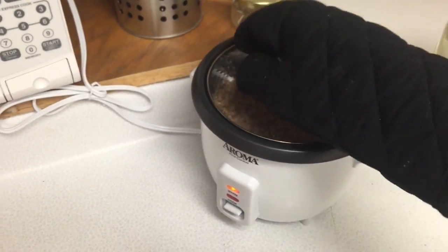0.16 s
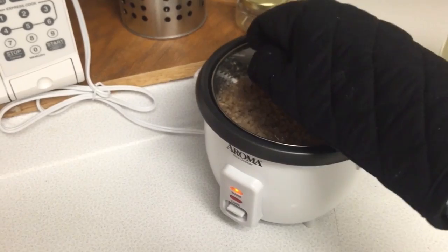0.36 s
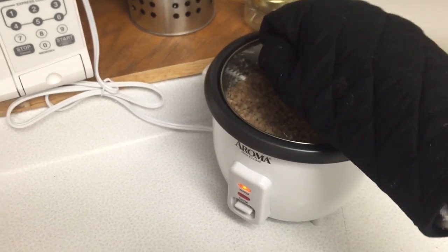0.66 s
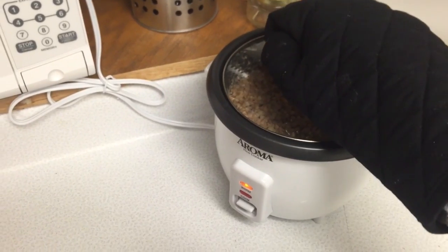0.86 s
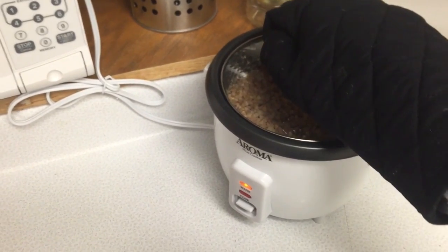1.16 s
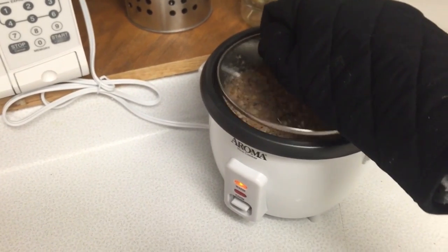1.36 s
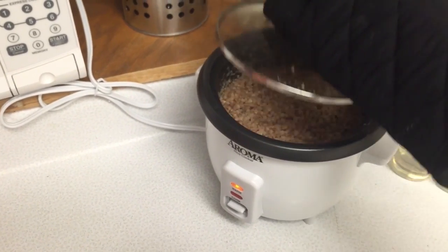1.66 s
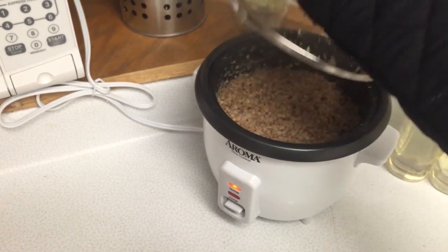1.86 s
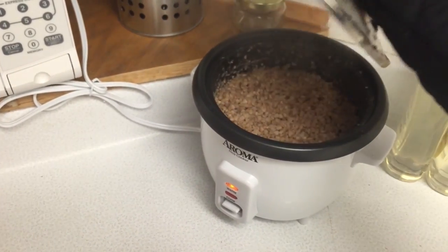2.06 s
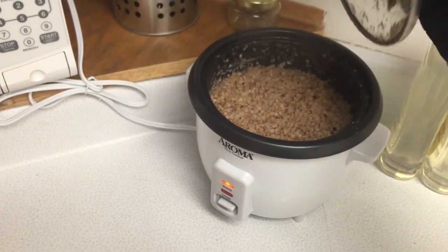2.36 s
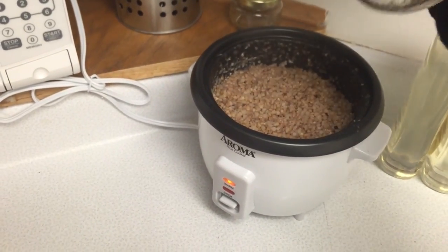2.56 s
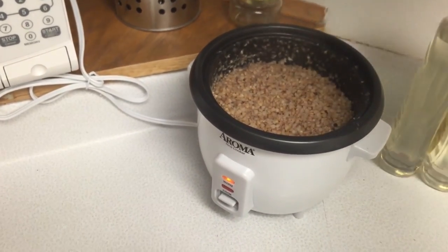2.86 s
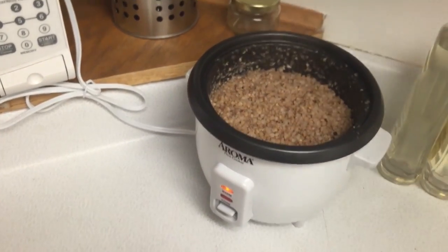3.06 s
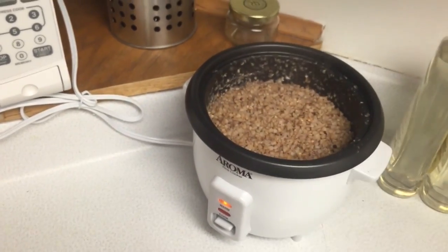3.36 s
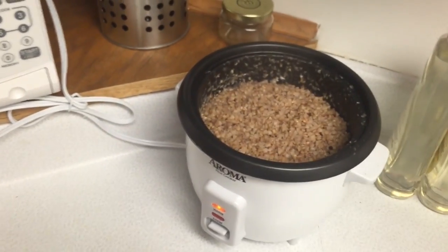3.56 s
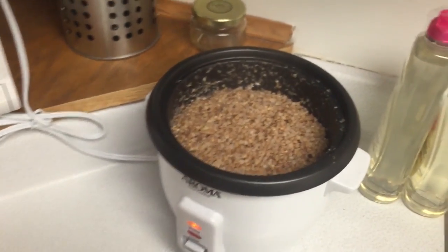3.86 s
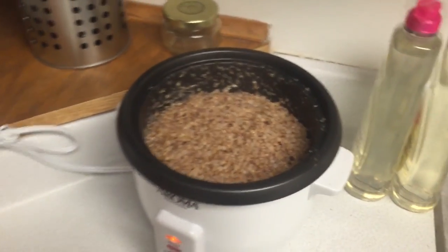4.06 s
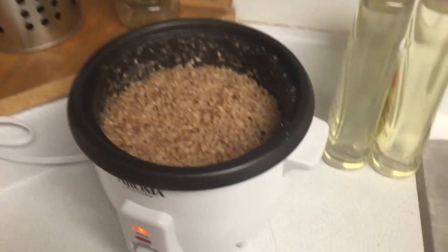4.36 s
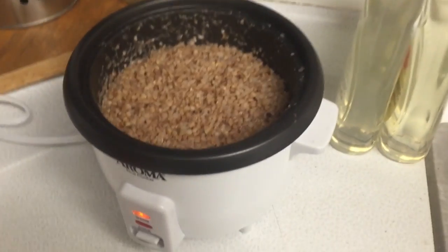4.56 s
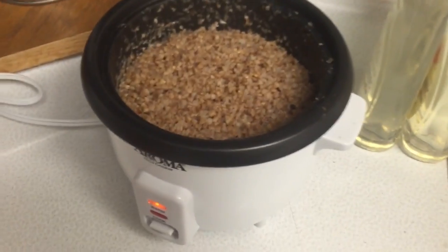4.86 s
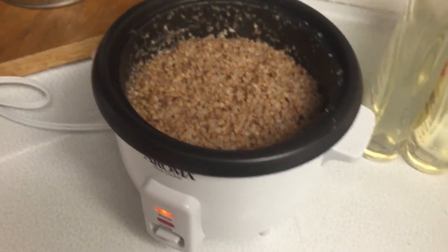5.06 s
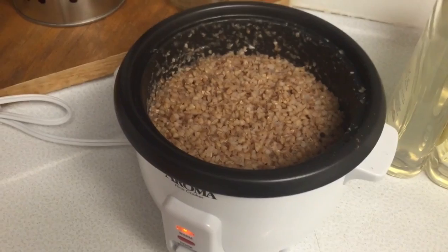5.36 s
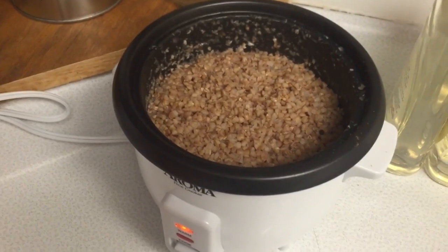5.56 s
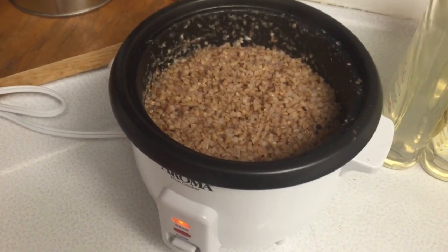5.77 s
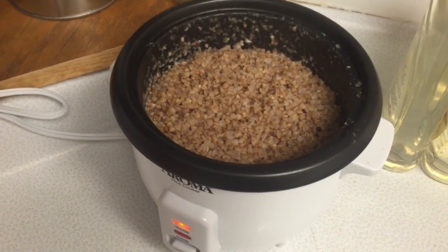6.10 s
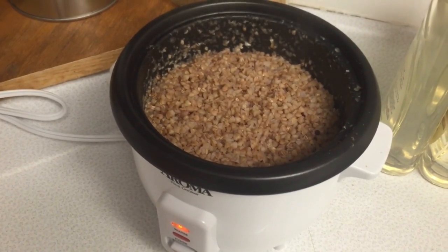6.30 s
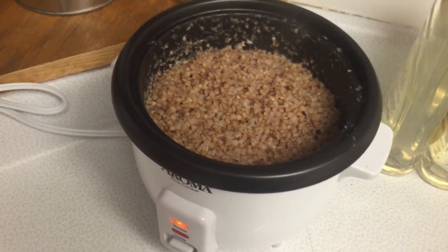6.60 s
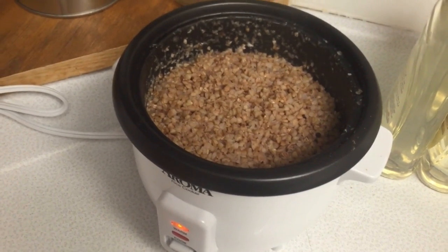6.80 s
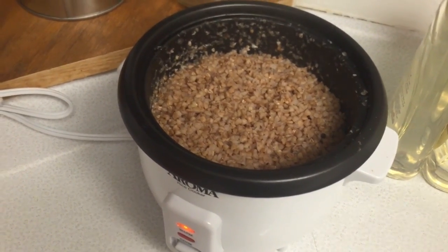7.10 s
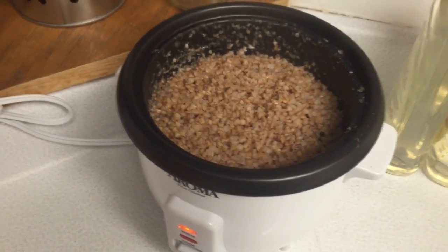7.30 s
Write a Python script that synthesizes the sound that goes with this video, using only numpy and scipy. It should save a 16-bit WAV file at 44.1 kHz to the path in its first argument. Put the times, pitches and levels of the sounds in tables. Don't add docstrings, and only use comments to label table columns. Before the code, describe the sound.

A handheld microphone near a rice cooker picks up low motor hum and airy room noise. Cloth rubs with short rubbery squeaks, a firm thud and several soft glass rattles, then a stronger knock as the lid lifts. Steam hisses slightly more from the open pot. One sharp glass clink rings briefly; after a quiet stretch of tiny ticks, another shorter clink lands. Light indoor reverberation.

```python
import sys
import numpy as np
from scipy import signal
from scipy.fft import rfft, irfft, next_fast_len
from scipy.io import wavfile
from scipy.ndimage import uniform_filter1d, map_coordinates

SR = 44100
rng = np.random.default_rng(int(sys.argv[2]) if len(sys.argv) > 2 else 0)


def magnitude_from_level(level_db):
    exponent = np.asarray(level_db, float) / 20
    return 10 ** exponent


def log_audio(samples):
    frames = np.atleast_2d(samples).T
    limited = np.clip(frames, -1, 1)
    pcm = np.round(limited * 32767).astype(np.int16)
    wavfile.write(sys.argv[1], SR, pcm)


N = 328104
TIME = np.arange(N) / SR

COMPRESSOR_HZ, MAINS_HZ = 58.805, 59.985
# multiple, level far from the pot/dB
# rms, level close to it/dB rms
COMPRESSOR_OVERTONES = [(1, -64, -64), (2, -61.5, -61), (3, -79.5, -69.5), (4, -73.5, -75), (5, -70, -76),
                        (6, -67, -70.5), (7, -71, -72.5), (9, -73, -101), (10, -83.5, -98),
                        (12, -83.5, -79), (13, -82, -81.5), (15, -77.5, -87), (17, -84.5, -81.5),
                        (19, -80.5, -81), (23, -86.5, -94), (24, -83.5, -76.5), (27, -91.5, -84),
                        (31, -80.5, -81), (32, -82, -81), (35, -87, -100), (36, -99, -92), (38, -96, -77),
                        (83, -85, -83), (95, -85, -89)]
# multiple, level/dB rms
MAINS_OVERTONES = [(1, -103), (2, -71), (6, -75), (40, -97), (52, -92), (53, -94), (55, -83.5), (58, -90.5),
                   (59, -86), (60, -83), (63, -87.5), (64, -91), (66, -89), (68, -86)]
# t/s, f/Hz, level/dB rms
DRONE = [(0.0, 470.1, -56.5), (0.23, 470.3, -54), (1.41, 470.8, -56), (1.43, 469.7, -53.5),
         (1.72, 470.8, -57.5), (1.93, 470.3, -55.5), (4.21, 470.7, -55.5), (4.25, 470.7, -61),
         (4.31, 470.7, -54.5), (5.12, 470.3, -59), (5.37, 470.5, -55.5), (5.51, 470.3, -60.5),
         (5.78, 470.7, -54.5), (5.82, 470.2, -60.5), (6.15, 470.8, -58), (7.25, 470.0, -59),
         (7.38, 468.7, -54.5), (7.44, 467.8, -60)]

# f/Hz, level/dB per Hz
RUMBLE_SPECTRUM = [(22, -50), (36, -10), (48, 1), (62, -13), (90, 6), (140, 1), (180, -6.5), (300, -9),
                   (450, -12), (700, -52)]
# f/Hz, level/dB per Hz
AIR_SPECTRUM = [(290, -15.5), (500, 4.5), (519, -3.5), (560, -2), (690, -4.5), (832, -5), (1030, -1),
                (1290, -5), (1370, -4.5), (2310, -3), (3000, -13.5), (3900, -17.5), (6600, -120)]
# f/Hz, level/dB per Hz
HISS_FAR = [(2200, -24), (2900, -1), (4200, 2), (5000, -1.5), (6000, 1.5), (6700, 2.5), (7400, -1.5),
            (8500, 1.5), (9800, -2.5), (10500, -6.5), (11300, -3.5), (15250, -6.5), (15350, -42.5),
            (16500, -47)]
# f/Hz, level/dB per Hz
HISS_NEAR = [(2200, -16), (2900, -0.5), (4200, 4.5), (5000, 0), (5800, 2), (6700, 5), (7500, -2), (8100, 3),
             (9000, 4), (10400, -2.5), (11300, -2.5), (15250, -5.5), (15350, -43), (16500, -48)]
RUMBLE_FAR_DB, RUMBLE_NEAR_DB, RUMBLE_SETTLES_S, RUMBLE_SWAY_DB = -58, -60.5, 6.2, 1.4
ARM_DB, ARM_S, ARM_WIDTH_S = 3, 1.85, 0.3
AIR_DB, MASKING_DB, MASKING_STARTS_S = -62.5, -1.5, 0.73
LID_OFF_S, LID_SWING_S = 1.54, 0.8
STEAM_SHUT_DB, STEAM_OPEN_DB, PUFF_DB, PUFF_S, PUFF_WIDTH_S = -67.5, -64.5, 1.5, 2.13, 0.257
CLOTH_HISS_DB, CLOTH_HISS_S, CLOTH_HISS_WIDTH_S = 2.5, 0.34, 0.2

# t/s, level/dB
CLOTH_RUB = [(0.0, -67), (0.178, -53.5), (0.342, -64), (0.48, -50), (0.556, -58), (0.69, -57.5),
             (1.086, -64), (1.6, -74)]
# f/Hz, level/dB per Hz
CLOTH_SPECTRUM = [(400, -44), (850, -9), (1050, 3), (1180, 5.5), (1330, 2), (1550, -3), (1750, -2),
                  (1900, -12.5), (2050, -4), (2150, -20), (2250, -1), (2450, -16), (2600, -10), (3500, -33)]
# t/s, f/Hz
GRIP_PITCH = [(.12, 1236), (.2, 1333), (.235, 1250), (.285, 1325), (.32, 1360), (.345, 1343), (.365, 1312),
              (.405, 1320), (.53, 1155), (.6, 1070), (.64, 1265), (.675, 1330), (.71, 1350)]
# start t/s, hold/s, level/dB
KNOB_SLIPS = [(.125, .015, -66), (0.188, .025, -61), (.245, .01, -58), (0.274, 0.0084, -45.5),
              (0.32, 0.076, -46.5), (.43, .03, -62), (0.533, 0.078, -60), (.655, .012, -58),
              (0.681, .012, -51)]
# start t/s, hold/s, level/dB, f/Hz
CLOTH_SLIPS = [(0.073, .005, -66, 1900), (.155, 0.0101, -63.5, 2060), (.31, 0.0095, -63, 2240),
               (0.4, .005, -64.5, 2020), (.41, 0.0087, -66, 2200), (.325, .015, -64, 2710),
               (0.1116, 0.0197, -66.5, 1880), (.19, 0.0198, -65, 1990), (0.25, 0.017, -66, 1680),
               (.18, .02, -62.5, 1030)]
SLIP_RISE_DB_PER_S, SLIP_FALL_DB_PER_S = 496, 706

# t/s, peak level/dB, f/Hz
POT_THUDS = [(.46, -40, 276), (.4955, -26, 294), (.511, -45, 310), (.522, -44, 310), (.534, -46, 310),
             (.612, -37.5, 299), (.697, -34.5, 225), (1.4236, -27.5, 316)]
# t/s, peak level/dB, f/Hz
COUNTER_THUDS = [(.27, -47, 129), (.502, -32.5, 147), (.531, -36.5, 151), (.703, -41.5, 143),
                 (1.302, -41, 114), (1.442, -27, 127), (1.481, -37, 124), (2.642, -43, 108),
                 (3.028, -44.5, 122), (3.426, -43, 99), (3.494, -46, 115), (3.534, -61, 118),
                 (5.629, -40.5, 111)]
POT_T60_S, COUNTER_T60_S = 0.031, 0.073

# f/Hz, width/Hz, level/dB
GRIP_MODES = [(320.5, 9.9, 13.5), (972, 45, -10), (1620, 79, -3), (1900, 60, -33), (2220, 39, -16),
              (3030, 160, -28)]
ROCK_MODES = [(533, 25, -1), (1070, 64, -12), (1117, 130, -2.5), (1740, 27, 0), (2250, 110, -11),
              (3630, 70, -18)]
SETTLE_MODES = [(1010, 160, -11), (1340, 180, -8), (1660, 74, 1), (2260, 140, -17)]
SLIP_MODES = [(606, 100, -13), (1280, 180, -13.5), (1560, 370, 10.5), (2070, 140, 11), (2700, 180, -12),
              (3130, 440, 6), (4140, 370, 2), (5560, 250, 2), (6860, 400, -27)]
LIFT_MODES = [(480, 72, -2), (902, 50, -2.5), (1126, 75, -5), (1610, 47, 4), (1770, 33, -1),
              (2200, 80, -22), (2320, 110, -14), (2970, 160, -26), (4380, 80, -26), (5320, 49, -26)]
REST_MODES = [(750, 62, -2), (1110, 33, 5), (1600, 89, 6), (1840, 100, 0.5), (2160, 67, -1),
              (3700, 214, -15), (4520, 200, -13)]
# t/s, level/dB, length/s
CONTACTS = [
    [(.483, -49, 0.0061), (.4912, -38, 0.0034), (.4975, -47, 0.0065)],
    [(.599, -50, 0.0032), (.605, -43, 0.01), (.618, -48.5, 0.031)],
    [(.688, -50, 0.0067), (.695, -45, 0.0037), (.7, -43.5, 0.0045)],
    [(.909, -44, 0.0048), (.913, -40.5, 0.0055), (.918, -45.5, 0.0074)],
    [(1.421, -45, 0.005), (1.4245, -35.5, 0.0068), (1.43, -44, 0.0028), (1.437, -41, 0.0058),
     (1.451, -48, 0.0035), (1.463, -55, 0.006), (1.472, -53, 0.0055), (1.481, -58, 0.0065)],
    [(3.535, -50, 0.0074), (3.543, -48, 0.0053), (3.56, -58, .012), (5.829, -59, .005), (6.919, -58, .005)],
]
SCRATCH_DB = [-30, -11, -24, -2.5, -11, -7]
PADDING_HZ = [3280, 14000, 5000, 14000, 12000, 9000]
# f/Hz, level/dB per Hz
SCRATCH_SPECTRUM = [(200, -30), (450, 9), (720, -7), (1000, 6), (1800, -1), (3000, -8), (6500, -13),
                    (10000, -18), (15000, -49)]
# t/s, f/Hz, level/dB, t60/s
FREE_RINGS = [(0.4913, 1476, -33, 0.034), (0.4914, 1646, -26, 0.036), (.4915, 2260, -30, 0.044),
              (.4915, 2970, -43, 0.027), (.498, 970, -37, 0.066), (.498, 1620, -27.5, 0.046),
              (.6, 1050, -39, .05), (.6, 1470, -40, .04), (.6, 1740, -36, .05), (.605, 1200, -38, 0.068),
              (.606, 2250, -45, .04), (.606, 3540, -49, 0.071), (.62, 1750, -47, .07),
              (.7, 1650, -41, 0.054), (0.909, 1295, -38, 0.045), (0.909, 1600, -37, 0.028),
              (0.91, 1730, -38, 0.032), (.911, 2070, -37, 0.053), (.911, 2760, -47, .04),
              (.912, 3180, -43, 0.055), (.909, 5460, -47, .04), (.912, 5700, -47, .04),
              (1.4234, 893, -33, 0.063), (1.4245, 1070, -35, 0.054), (1.427, 1170, -40, 0.076),
              (1.4235, 1504, -33, 0.099), (1.4247, 1733, -28, 0.063), (1.4235, 2250, -30.5, 0.049),
              (1.4235, 2400, -40, .04), (1.4225, 2920, -43, 0.034), (1.464, 1660, -44, .04),
              (1.472, 1620, -43, .05), (3.536, 1780, -44, .03), (3.543, 1700, -44, .035),
              (1.423, 4405, -49.5, 0.11), (1.4235, 5283, -55, 0.075)]

# t/s, level/dB, t60/s
SNAPS = [
    (.6055, -48, 0.077),
    (0.9088, -50, .05),
    (1.423, -47.5, 0.046),
]
# f/Hz, level/dB per Hz
SNAP_SPECTRUM = [(1200, -40), (2500, 3), (5000, 1), (8000, -6), (11000, -19), (15000, -30)]
# t/s, level/dB
TICKS = [(1.813, -59), (1.904, -60), (2.087, -58), (2.193, -58), (2.325, -62), (2.446, -62), (2.881, -62),
         (2.923, -62), (3.036, -61), (3.218, -63), (3.454, -62), (4.811, -63), (5.001, -62), (5.165, -62),
         (5.193, -63), (5.69, -64), (5.829, -63), (6.64, -64), (6.919, -64), (7.183, -64), (7.318, -63)]
# f/Hz, level/dB per Hz
TICK_SPECTRUM = [(3000, -30), (6000, -4), (9000, 9), (14000, -2), (15300, -13)]
TICK_T60_S, CRACKLE_DB, CRACKLE_SPREAD_DB = 0.012, -69, 1.3

# t/s, crack level/dB, t60/s, wash level/dB, t60/s, lead-in scrape level/dB
CLINKS = [
    (1.9769, -21.5, 0.021, -47.5, 0.38, -43.5),
    (5.3138, -22, 0.011, -42, 0.18, -40),
]
GLASS_HZ = [668, 1597, 2880, 3418, 4150, 4441, 5620, 6308, 7225, 8465, 9240, 9970, 10850, 11700, 13470]
TWIN_HZ = [665, 1600, 2862, 3440, 4330, 4438, 5580, 6300, 7200, 8458, 9255, 9555, 10865, 11690, 13400]
# quick level/dB, t60/s, twin level/dB, t60/s
FIRST_MODES = [(-46, .1, -37, 0.57), (-27.5, 0.032, -38.5, 0.87), (-21.5, 0.03, -30, 0.22),
               (-38, 0.039, -44.5, .15), (-41.5, 0.027, -48, .2), (-15, 0.062, -42, 0.27),
               (-38.5, 0.0279, -46, .25), (-11, 0.069, -40, 0.22), (-17, 0.036, -45, 0.19),
               (-23.5, 0.05, -44, .17), (-22, 0.065, -44.5, .13), (-28, .045, -52.5, 0.202),
               (-26.5, 0.04, -50, 0.15), (-29, 0.0416, -57, .14), (-24, .03, -51, .16)]
# quick level/dB, t60/s, twin level/dB, t60/s
SECOND_MODES = [(-51, 0.093, -64, 0.112), (-32.5, 0.024, -33, 0.4), (-41, 0.025, -33.5, 0.33),
                (-53, .05, -60, .1), (-24, 0.03, -56, .1), (-21, 0.083, -39, 0.18), (-23.5, 0.036, -56, .2),
                (-17.5, 0.031, -56, 0.166), (-49, 0.088, -51, 0.186), (-28, 0.026, -50, .2),
                (-49, 0.068, -64, .15), (-58, .04, -66, .1), (-59.5, .08, -61, .12), (-47, .05, -66, .1),
                (-52, .05, -68, .1)]
# f/Hz, level/dB
CRACK_SPECTRA = [
    [(500, -45.5), (1200, -41.5), (1900, -2.5), (3300, -6), (4300, -5), (7000, -10), (10000, -8.5),
     (14000, -18), (14800, -45.5)],
    [(500, -51), (1300, -15), (2200, -11.5), (3600, 0), (4200, 5), (6000, 0), (9000, -13), (14300, -23),
     (15500, -33)],
]
# f/Hz, level/dB, t60/s
NEIGHBOURS = [
    [(2010, -30.5, 0.022), (2405, -25.5, 0.022), (4160, -28.5, 0.033), (6600, -29, .035), (7380, -24, .035)],
    [(2480, -39, 0.037), (3240, -43, 0.044), (3700, -41, .025), (3850, -39, .025), (5330, -42, .03),
     (5880, -30, .03), (6105, -35, .03), (6840, -42, .03)],
]
NULLS_S = [
    [.2, .27, .2],
    [.12, .2, .12],
]
# t after the first/s, level/dB
BOUNCES = [
    (.0015, 0),
    (.0062, -3),
]
SWISH_DB = [-57, -60]
SWISH_S = 0.021
PAIR_DEPTH = 0.88
SPLIT_HZ, SPLIT_DB = 28, -6

# f/Hz, t60/s
KITCHEN_DECAY = [(200, 0.28), (2000, 0.24), (5000, 0.33), (10000, 0.22)]


def unit(x):
    return x / np.sqrt(np.mean(x ** 2) + 1e-20)


def along(points, hz):
    f, v = np.transpose(points)
    return np.interp(np.log(hz + 1), np.log(f + 1), v)


def curves(rows):
    s, *columns = np.transpose(rows)
    return [np.interp(TIME, s, column) for column in columns]


def wobble(rate):
    knots = rng.standard_normal(int(N * 200 / SR) + 4)
    return map_coordinates(knots, [TIME * min(rate, 200)])


def filtered(x, response):
    size = next_fast_len(len(x) + 8192)
    spectrum = rfft(x, size) * response(np.fft.rfftfreq(size, 1 / SR))
    return irfft(spectrum, size)[:len(x)]


def noise(spectrum, count=N):
    return unit(filtered(rng.standard_normal(count), lambda hz: magnitude_from_level(along(spectrum, hz))))


def patchy(x, depth_db):
    z = signal.stft(x, nperseg=512)[2]
    patches = uniform_filter1d(rng.standard_normal(z.shape), 3, 0)
    patches = uniform_filter1d(patches, 16, 1)
    return unit(signal.istft(z * magnitude_from_level(depth_db * unit(patches)), nperseg=512)[1][:N])


def add(track, s, sound):
    part = track[round(s * SR):][:len(sound)]
    part += sound[:len(part)]


def ring(t, hz, db, t60, attack):
    return magnitude_from_level(db - 60 * t / t60) * np.sin(2 * np.pi * hz * t) * (1 - np.exp(-t / attack))


def nearness(t):
    return np.clip((t - 3.4) / 2.1, 0, 1)


def start_phase(multiple):
    return rng.uniform(0, 2 * np.pi) * (multiple > 2.5)


def fridge():
    shaft = 2 * np.pi * COMPRESSOR_HZ * TIME
    mains = shaft + 2 * np.pi * (MAINS_HZ - COMPRESSOR_HZ) * (TIME - 0.16)
    drone_db = curves(DRONE)[1] + 0.39 * wobble(2.56)
    hum = magnitude_from_level(drone_db + 0.63 * wobble(8)) * np.sin(8 * shaft)
    slow = np.arange(0, N, 64)
    for k, far_db, near_db in COMPRESSOR_OVERTONES:
        drift = map_coordinates(rng.standard_normal(40), [slow / SR * 1.54])
        level_db = far_db + (near_db - far_db) * nearness(slow / SR) + 2.5 * drift
        level = np.repeat(magnitude_from_level(level_db), 64)[:N]
        hum += level * np.sin(round(k) * shaft + start_phase(k))
    for k, db in MAINS_OVERTONES:
        hum += magnitude_from_level(db) * np.sin(round(k) * mains + start_phase(k))
    return np.sqrt(2) * hum


def bump(centre_s, width_s):
    return np.exp(-((TIME - centre_s) / width_s) ** 2)


def air():
    opened = np.clip((TIME - LID_OFF_S) / LID_SWING_S, 0, 1)
    air_db = AIR_DB + MASKING_DB * (TIME > MASKING_STARTS_S) * (1 - opened)
    hiss_db = STEAM_SHUT_DB + (STEAM_OPEN_DB - STEAM_SHUT_DB) * opened
    hiss_db += PUFF_DB * bump(PUFF_S, PUFF_WIDTH_S)
    hiss_db += CLOTH_HISS_DB * bump(CLOTH_HISS_S, CLOTH_HISS_WIDTH_S)
    steadied = np.clip(TIME / RUMBLE_SETTLES_S, 0, 1)
    rumble_db = RUMBLE_FAR_DB + (RUMBLE_NEAR_DB - RUMBLE_FAR_DB) * steadied
    rumble_db += ARM_DB * bump(ARM_S, ARM_WIDTH_S)
    lumps = unit(noise(RUMBLE_SPECTRUM) * magnitude_from_level(0.99 * wobble(17)))
    rumble = magnitude_from_level(rumble_db + RUMBLE_SWAY_DB * wobble(3.21)) * lumps
    turn = nearness(TIME) * np.pi / 2
    hiss = np.cos(turn) * noise(HISS_FAR) + np.sin(turn) * noise(HISS_NEAR)
    room_air = magnitude_from_level(air_db) * patchy(noise(AIR_SPECTRUM), depth_db=2.0)
    return rumble + room_air + magnitude_from_level(hiss_db) * patchy(hiss, depth_db=1.8)


def squeak(pitch, level_db):
    phase = 2 * np.pi * np.cumsum(pitch * (1 + 0.0074 * wobble(58.7))) / SR
    tone = np.sqrt(2) * (np.sin(phase) + magnitude_from_level(-32) * np.sin(2 * phase))
    return magnitude_from_level(level_db + 0.98 * wobble(74.6)) * tone


def slip_db(s, hold, db):
    rise = SLIP_RISE_DB_PER_S * np.clip(s - TIME, 0, 1)
    fall = SLIP_FALL_DB_PER_S * np.clip(TIME - s - hold, 0, 1)
    return db - rise - fall


def glove():
    fade = np.clip((1.6 - TIME) / 0.52, 0, 1)
    rustle = unit(noise(CLOTH_SPECTRUM) * magnitude_from_level(2.2 * wobble(78.6)))
    knob_db = np.max([slip_db(*row) for row in KNOB_SLIPS], axis=0)
    knob = squeak(curves(GRIP_PITCH)[0], knob_db)
    faint_db = np.array([slip_db(*row[:-1]) for row in CLOTH_SLIPS])
    faint_pitch = np.array(CLOTH_SLIPS)[faint_db.argmax(axis=0), -1]
    faint = squeak(faint_pitch, faint_db.max(axis=0))
    return knob + faint + magnitude_from_level(curves(CLOTH_RUB)[0] - 7.5) * fade * rustle


def thuds():
    out, t = np.zeros(N), np.arange(SR // 4) / SR
    for rows, t60 in [(POT_THUDS, POT_T60_S), (COUNTER_THUDS, COUNTER_T60_S)]:
        for s, db, hz in rows:
            add(out, s, ring(t, hz, db + 1.5, t60, attack=0.001))
    return out


def damped_body(f, modes, soft_hz):
    total = 0
    for k, (centre, width, db) in enumerate(modes):
        damping = 1j * f * width
        total = total + (-1) ** k * magnitude_from_level(db) * damping / (centre * centre - f * f + damping)
    return total / (1 + 1j * f / soft_hz - (f / soft_hz) ** 2)


def knocks():
    out, t = np.zeros(N), np.arange(SR // 5) / SR
    bodies = [GRIP_MODES, ROCK_MODES, SETTLE_MODES, SLIP_MODES, LIFT_MODES, REST_MODES]
    for modes, rows, scratch_db, soft_hz in zip(bodies, CONTACTS, SCRATCH_DB, PADDING_HZ):
        for s, db, length in rows:
            push = np.exp(-(t / length) ** 2 * 2) * (1 - np.exp(-t / 0.0026))
            chatter = rng.standard_normal(len(t)) * push
            ringing = filtered(chatter, lambda f: damped_body(f, modes, soft_hz))
            scratch = magnitude_from_level(scratch_db) * push * noise(SCRATCH_SPECTRUM, count=len(t))
            add(out, s, magnitude_from_level(db + 7.5) * (ringing / np.abs(ringing).max() + scratch))
    for s, hz, db, t60 in FREE_RINGS:
        add(out, s, ring(t, hz, db, t60, attack=0.0011))
    return out


def ticks():
    out, t = np.zeros(N), np.arange(SR // 20) / SR
    for s, db, t60 in SNAPS:
        add(out, s, magnitude_from_level(db - 60 * t / t60) * noise(SNAP_SPECTRUM, count=len(t)))
    weak = []
    for u, v in rng.random((70, 2)):
        s = LID_OFF_S + (N / SR - LID_OFF_S) * u
        weak.append((s, CRACKLE_DB - CRACKLE_SPREAD_DB * np.log(v)))
    for s, db in TICKS + weak:
        add(out, s, magnitude_from_level(db - 60 * t / TICK_T60_S) * noise(TICK_SPECTRUM, count=len(t)))
    return out


def glass_ring(out, s, t, modes, nulls):
    for k, (hz, twin_hz, row) in enumerate(zip(GLASS_HZ, TWIN_HZ, modes)):
        db, quick, twin_db, slow = row
        sign = (-1) ** k
        beat = sign
        if k < len(nulls):
            beat = sign * (1 + PAIR_DEPTH * np.cos(np.pi * t / nulls[k])) / (1 + PAIR_DEPTH)
        add(out, s, sign * ring(t, hz, db, quick, attack=0.00039))
        add(out, s, beat * ring(t, twin_hz, twin_db, slow, attack=0.0095))
        if hz > 3000:
            split_hz = twin_hz + SPLIT_HZ * rng.uniform(0.45, 1.7)
            add(out, s, beat * ring(t, split_hz, twin_db + SPLIT_DB, slow, attack=0.007))


def crack(out, t, row, colour, swish_db, bounce):
    s, crack_db, t60, wash_db, wash_t60, scrape_db = row
    skip_s, skip_db = bounce
    dying = magnitude_from_level(crack_db - 60 * t / t60) + magnitude_from_level(wash_db - 60 * t / wash_t60)
    splash = noise(colour, count=len(t))
    add(out, s, dying * splash)
    add(out, s + skip_s, magnitude_from_level(crack_db + skip_db - 60 * t / t60) * splash[::-1])
    lead = t[t < 0.008]
    add(out, s - 0.008, magnitude_from_level(scrape_db) * lead / 0.0083 * np.sin(2 * np.pi * 2900 * lead))
    brush = t[t < SWISH_S]
    add(out, s - SWISH_S, magnitude_from_level(swish_db) * np.sqrt(brush / SWISH_S) * noise(colour, count=len(brush)))


def clinks():
    hits, t = [], np.arange(SR // 2) / SR
    for i, modes in enumerate([FIRST_MODES, SECOND_MODES]):
        out, s = np.zeros(N), CLINKS[i][0]
        for hz, db, t60 in NEIGHBOURS[i]:
            add(out, s, ring(t, hz, db, t60, attack=0.00041))
        glass_ring(out, s, t, modes, NULLS_S[i])
        crack(out, t, CLINKS[i], CRACK_SPECTRA[i], SWISH_DB[i], BOUNCES[i])
        hits.append(out)
    return hits


def kitchen(x):
    hz, t, z = signal.stft(rng.standard_normal(SR // 2), SR, nperseg=256)
    decay = magnitude_from_level(-60 * t / along(KITCHEN_DECAY, hz)[:, None])
    tail = signal.istft(z * decay, SR, nperseg=256)[1]
    delayed = np.pad(x, (250, 0))
    return signal.fftconvolve(delayed, tail / np.linalg.norm(tail))[:N]


def scene():
    background = fridge() + air()
    dull = glove() + knocks()
    glass = clinks()
    glass_echo = magnitude_from_level(-21.5) * sum(kitchen(hit) for hit in glass)
    dull_echo = magnitude_from_level(-18.5) * kitchen(dull)
    return (sum(glass) + glass_echo + dull + dull_echo + thuds() + ticks() + background)[None]


def top_cut(x):
    return signal.sosfilt(signal.butter(12, 16380, fs=SR, output="sos"), x)


def record(dry):
    limited = filtered(dry[0], lambda hz: np.where(hz < 15400, 1, magnitude_from_level(-26.5)))
    return top_cut(limited[None])


dry = scene()
out = record(dry)
log_audio(out)
```